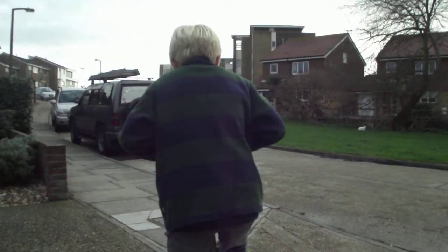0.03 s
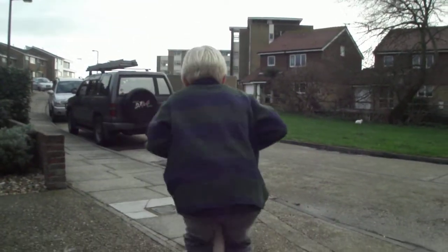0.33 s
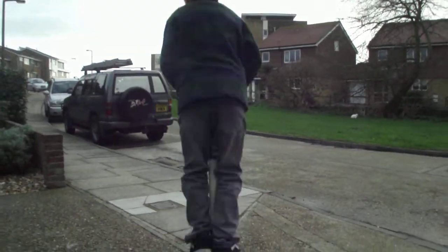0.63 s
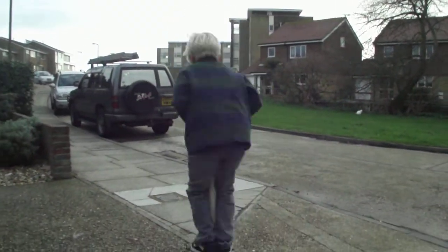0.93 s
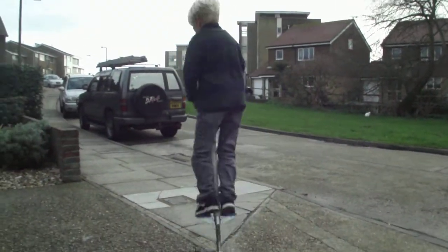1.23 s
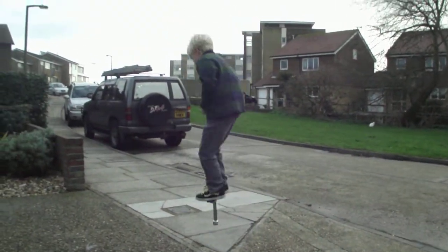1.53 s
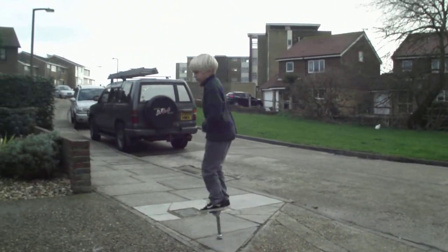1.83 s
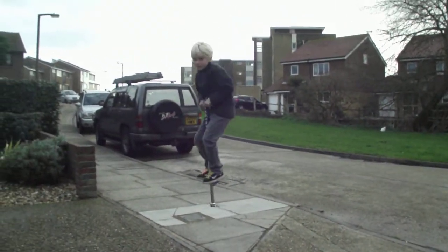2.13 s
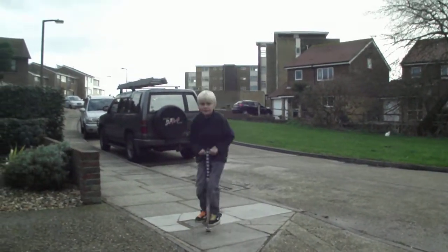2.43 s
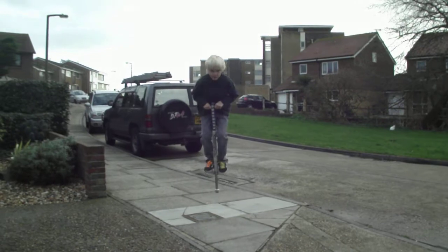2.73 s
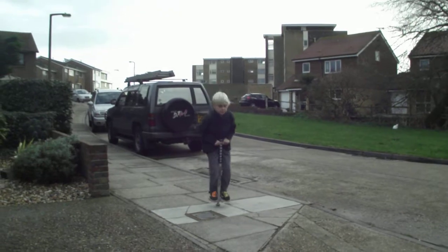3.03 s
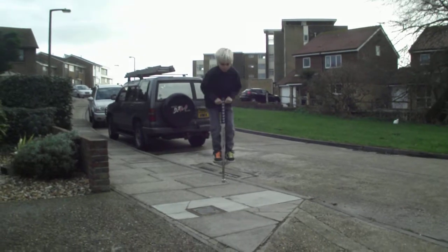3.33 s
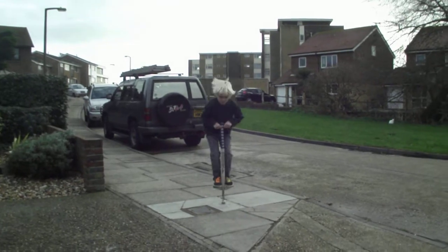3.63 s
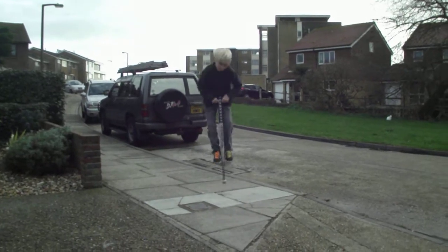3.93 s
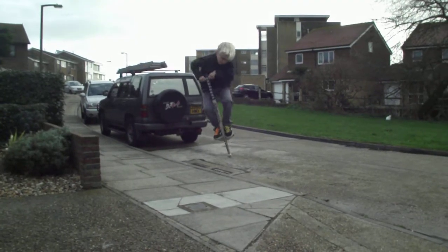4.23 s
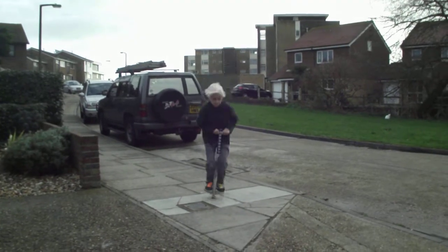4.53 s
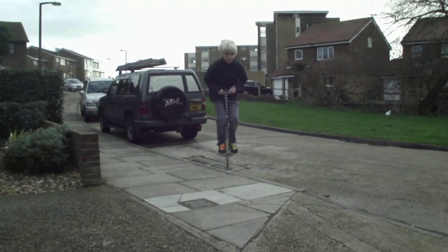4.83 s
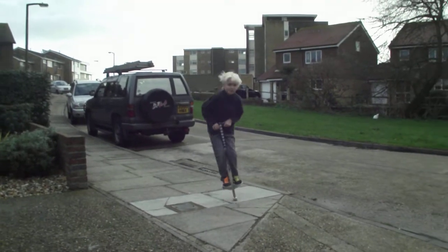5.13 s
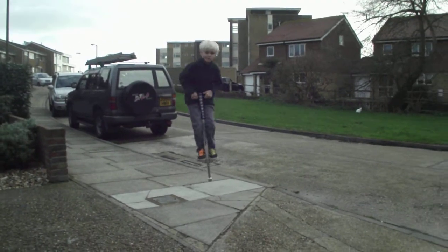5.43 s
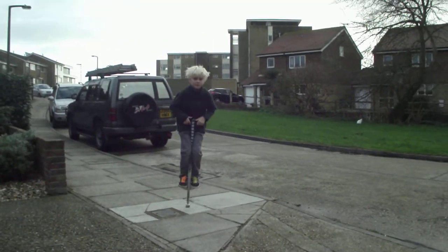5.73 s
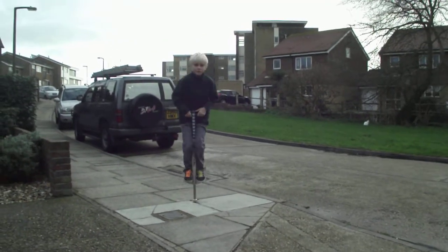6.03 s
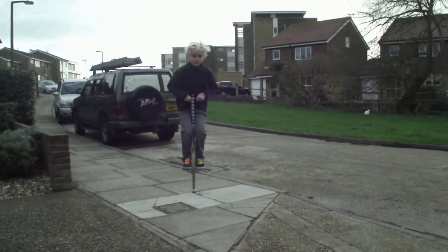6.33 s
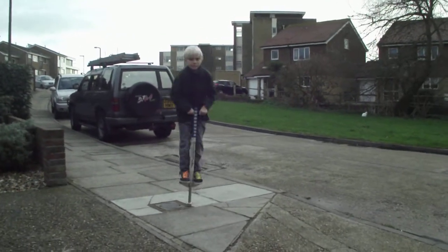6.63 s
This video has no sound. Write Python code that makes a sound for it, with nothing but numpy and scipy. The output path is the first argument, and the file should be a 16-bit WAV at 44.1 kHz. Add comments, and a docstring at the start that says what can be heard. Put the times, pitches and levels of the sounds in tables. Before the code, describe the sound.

A pogo stick rattles, then bounces ten times on paving slabs close to the microphone, in a steady rhythm. Each bounce has a rubber thud, a scraping steel spring, a knock and a sharp ringing clack, echoing faintly off house fronts. Wind and far traffic rumble through the quiet street, with a thin camcorder whine and a faint whistle once a second.

```python
"""Wind and far traffic rumble in a quiet street; a camcorder whines and whistles once a second.
A pogo stick rattles, then a child bounces on it ten times on paving slabs, close by. In each bounce
the rubber foot thuds down, the steel spring scrapes along its tube as it is squeezed, knocks at the
bottom, then scrapes back until the shaft clacks against its stop. The bright microphone overloads
on the hardest blows, and house fronts answer faintly."""
import sys
import numpy as np
from scipy import signal
from scipy.fft import rfft, irfft
from scipy.io import wavfile
from scipy.ndimage import uniform_filter1d

SR = 44100
rng = np.random.default_rng(int(sys.argv[2]) if len(sys.argv) > 2 else 0)


def store_pcm(level_fs):
    """Save levels as 16-bit WAV."""
    pcm = np.round(np.clip(level_fs, -1, 1) * 32767).astype(np.int16)
    wavfile.write(sys.argv[1], SR, np.atleast_2d(pcm).T)


N = 298557
TIME = np.arange(N) / SR


def undb(db):
    """Decibels to gain."""
    return 10 ** (np.asarray(db) / 20)


def unit(x):
    """Scale to rms 1."""
    return x / np.sqrt(np.mean(x ** 2))


def fade(t, t60):
    """Exponential decay, 60 dB in t60 seconds."""
    return np.exp(-np.log(1000) * t / t60)


def add(out, start_s, x):
    """Mix x into out from start_s."""
    i = max(int(start_s * SR), 0)
    out[i:i + len(x)] += x[:max(len(out) - i, 0)]


def walk(rate_hz):
    """Random steps at rate_hz, smoothed twice; rms 1."""
    hold = int(SR / rate_hz)
    steps = np.repeat(rng.standard_normal(N // hold + 1), hold)
    return unit(uniform_filter1d(uniform_filter1d(steps, hold), hold)[:N])


def colour(x, points, size=8192):
    """Minimum-phase filter shaped by (Hz, dB) points; keeps the power of white noise."""
    hz, db = np.transpose(points)
    grid_hz = np.maximum(np.arange(size // 2 + 1) * SR / size, 1)
    gain = undb(np.interp(np.log(grid_hz), np.log(hz), db))
    cepstrum = irfft(np.log(gain))
    cepstrum[1:size // 2] *= 2
    cepstrum[size // 2 + 1:] = 0
    response = irfft(np.exp(rfft(cepstrum)))
    return signal.fftconvolve(x, response / np.linalg.norm(response))[:N]


def resonance(x, hz, width_hz):
    """Band-pass with a moving centre: shift to 0 Hz, smooth, shift back."""
    spin = np.exp(2j * np.pi * np.cumsum(hz) / SR)
    pole = np.exp(-np.pi * width_hz / SR)
    return 2 * np.real(spin * signal.lfilter([1 - pole], [1, -pole], x / spin))


def tail(x, t60, delay_s):
    """Dense decay of modes or reflections, at unit power gain."""
    t = np.arange(SR) / SR
    response = rng.standard_normal(SR) * fade(t, t60) * (t > delay_s)
    return signal.fftconvolve(x, response / np.linalg.norm(response))


def rings(starts_s, levels_db, modes, scatter):
    """Damped modes, detuned at random on each blow."""
    out, t = np.zeros(N), np.arange(SR // 2) / SR
    for start_s, db in np.broadcast(starts_s, levels_db):
        for hz, mode_db, t60 in modes:
            detuned_hz = hz * (1 + scatter * rng.standard_normal())
            add(out, start_s, undb(db + mode_db) * fade(t, t60) * np.sin(2 * np.pi * detuned_hz * t))
    return out


# Wind and far traffic. Each row: frequency in Hz, relative density in dB.
STREET_SPECTRUM = [(15, -12.5), (26, -0.5), (50, -2), (110, -13), (240, -17.5), (470, -27), (700, -22.5),
                   (1700, -26.5), (2400, -24.5), (2880, -14.5), (3600, -33.5), (4800, -40.5), (8000, -39),
                   (14000, -44)]
# Breeze. Each row: time in seconds, relative rumble level in dB.
GUSTS = [(0.0, -29), (1.68, -29), (2.2, -34.5), (2.32, -29.5), (4.26, -29.5), (4.66, -26.5), (5.81, -30.5),
         (6.77, -32)]


def street(level_db=-26, waver_db=0.35, rumble_hz=130):
    """Far traffic washes above a rumble that follows the breeze."""
    air = colour(rng.standard_normal(N), STREET_SPECTRUM)
    low = signal.sosfiltfilt(signal.butter(2, rumble_hz, fs=SR, output="sos"), air)
    gust_db = np.interp(TIME, *np.transpose(GUSTS))
    rumble = low * undb(gust_db - gust_db.mean())
    traffic = (air - low) * undb(waver_db * walk(rate_hz=7))
    return undb(level_db) * unit(rumble + traffic)


def motor_whine(hz=7444, partials_db=(-44.5, -42), flutter=0.0021, flutter_hz=220):
    """The camcorder's motor: two partials with a quick flutter."""
    phase = 2 * np.pi * np.cumsum(hz * (1 + flutter * walk(flutter_hz))) / SR
    return sum(undb(db) * unit(np.sin(k * phase)) for k, db in enumerate(partials_db, 1))


# Camcorder whistle. Each row: start in seconds, end in seconds.
WHISTLE_SPANS = [(.14, .37), (1.15, 1.32), (2.15, 2.39), (3.15, 3.32), (4.15, 4.38), (5.15, 5.32),
                 (6.15, 6.38)]


def whistle(hz=10140, level_db=-46):
    """A thin tone in the camcorder switches on once a second."""
    gate = sum(1. * ((TIME > start) & (TIME < end)) for start, end in WHISTLE_SPANS)
    return undb(level_db) * uniform_filter1d(gate, size=200) * unit(np.sin(2 * np.pi * hz * TIME))


# Response of the struck stick. Each row: frequency in Hz, relative density in dB.
STRUCK_SPECTRUM = [(250, -25), (430, -23), (630, -11.5), (900, -16), (1250, -12), (1600, -12), (2400, -1.5),
                   (2950, 2.5), (3900, -16.5), (5100, -36), (6400, -16.5), (7850, -9), (9600, -17),
                   (13000, -33.5)]


def blows(starts_s, levels_db, t60):
    """Metal meets metal: brief contact chatter shakes the whole stick."""
    contact, t = np.zeros(N), np.arange(SR // 16) / SR
    for start_s, db in np.broadcast(starts_s, levels_db):
        add(contact, start_s, undb(db) * rng.choice([-1, 1], len(t)) * fade(t, t60))
    return colour(contact, STRUCK_SPECTRUM)


def knocks(starts_s, levels_db, t60, cutoff_hz=4800):
    """Duller blows, with the treble rolled off."""
    lowpass = signal.butter(1, cutoff_hz, fs=SR, output="sos")
    return signal.sosfilt(lowpass, blows(starts_s, levels_db, t60))


# Rattles. Each row: start in seconds, relative level in dB.
RATTLE_HITS = [(.218, -12.5), (.277, -17), (1.278, -20), (2.404, -12), (2.442, -11.5), (3.074, -14),
               (3.778, -23), (4.532, -20), (6.12, -20)]


def rattles():
    """Loose parts knock on the stick."""
    return knocks(*np.transpose(RATTLE_HITS), t60=0.043)


# Landings. Each row: start in seconds, squeeze length in seconds, then relative levels in dB of
# foot thud, clank, squeeze scrape, bottom thump, bottom knock and hollowness.
TOUCHDOWNS = [(0.324, 0.047, -47.5, -33, -19.5, -36, -31, 6),
              (.8869, 0.12, -19.5, -4, -11.5, -23.5, -9, 3.5),
              (1.5979, 0.089, -20, -4.5, -11, -15, -12.5, 0),
              (2.2656, 0.084, -21.5, -16, -9.5, -20, -9.5, -0.5),
              (2.9096, 0.099, -23.5, -16, -9.5, -21.5, -15.5, -1),
              (3.607, 0.11, -19.5, -14, -11.5, -17.5, -11.5, -4),
              (4.4, 0.091, -16, -8, -9.5, -15, -10.5, 0), (5.088, 0.093, -18.5, -9, -11.5, -22, -12.5, 2.5),
              (5.732, 0.098, -16, -11, -12, -36, -21, 3), (6.3854, 0.09, -16.5, -6, -8.5, -20.5, -7.5, -1)]
TOUCH_S, SQUEEZE_S, FOOT_DB, CLANK_DB, SQUEEZE_DB, THUMP_DB, KNOCK_DB, HOLLOW_DB = np.transpose(TOUCHDOWNS)
BOTTOM_S = TOUCH_S + SQUEEZE_S
BOUNCE_ROW = np.maximum(np.searchsorted(TOUCH_S, TIME) - 1, 0)
# Modes of foot on slab, and of frame. Each row: frequency in Hz, relative level in dB, t60 in seconds.
FOOT_MODES = [(161, -8.5, 0.066), (311, 5.5, 0.015), (610, 3, 0.012)]
FRAME_MODES = [(108, -9, 0.14), (177.5, -0.5, 0.055), (287, -9, 0.038)]


def foot_thud(slap_delay_s=0.02034):
    """The rubber foot hits the slab; a second slap rings the frame."""
    thud = rings(TOUCH_S, FOOT_DB + 7, FOOT_MODES, scatter=0.081)
    slap = rings(TOUCH_S + slap_delay_s, FOOT_DB - 1.5, FRAME_MODES, scatter=0.16)
    return thud + slap


def landing_clank():
    """The landing jolts the steel."""
    return blows(TOUCH_S + 0.001, CLANK_DB + 6, t60=0.011)


def shaft_speed(touch_s, bottom_s, lift_s, squeeze_db, release_db):
    """One bounce: the spring slows the shaft to a halt, then drives it back and shivers on."""
    slowing_db, ease_db_per_s = 7, 62
    turn_s, gather_s, shiver_s = 0.035, 0.09, 0.016
    depth = np.clip((TIME - touch_s) / (bottom_s - touch_s), 0, 1)
    halt = fade(np.maximum(TIME - bottom_s, 0), t60=0.055)
    down = (TIME > touch_s) * undb(squeeze_db + 1 - slowing_db * depth ** 2) * halt
    rising_s = np.minimum(TIME, lift_s) - bottom_s - turn_s
    gather = np.sin(np.pi / 2 * np.clip(rising_s / gather_s, 0, 1)) ** 2
    ease_db = ease_db_per_s * np.maximum(rising_s - gather_s, 0)
    settle = fade(np.maximum(TIME - lift_s - shiver_s, 0), t60=0.23)
    return down + gather * undb(release_db - ease_db) * settle


def friction(judder_hz=150, judder_db=2.33, ticks_per_s=190, tick_db=-6, tick_spread_db=2.5):
    """Coils slip on the tube and tick against it at an uneven pace."""
    slips = unit(rng.standard_normal(N) * undb(judder_db * walk(judder_hz)))
    coils_passed = np.floor(np.cumsum(ticks_per_s * np.exp(.5 * walk(ticks_per_s))) / SR)
    impulses = np.diff(coils_passed, prepend=0) * rng.choice([-1, 1], N)
    ticks = unit(impulses * undb(tick_spread_db * rng.standard_normal(N)))
    return unit(slips + undb(tick_db) * ticks)


# Lift-offs. Each row: arrival at the stop in seconds, relative levels in dB of release scrape and
# shaft rebound, loaded spring resonance in Hz.
RELEASES = [(.505, -12.5, -11, 3030), (1.141, -9, -6.5, 2800), (1.831, -11, -10.5, 2989),
            (2.491, -9.5, -26, 3100), (3.157, -11, -21, 2990), (3.862, -9, -15, 3200),
            (4.645, -11, -17, 3230), (5.328, -11.5, -24, 3070), (5.982, -11, -13, 3037),
            (6.621, -9, -37, 3050)]
LIFT_S, RELEASE_DB, REBOUND_DB, LOADED_HZ = np.transpose(RELEASES)
# Response of the scraped spring. Each row: frequency in Hz, relative density in dB.
SCRAPE_SPECTRUM = [(200, -21), (430, -23), (620, -13), (880, -22), (1220, -10), (1600, -11.5), (2550, -6),
                   (3080, -1.5), (3950, -11), (5100, -32.5), (6400, -21), (7850, -10), (10000, -25.5),
                   (13000, -41.5)]


def spring_scrape(free_hz=2870, unload_s=0.033):
    """Friction follows shaft speed; the spring's resonance glides to free_hz after lift-off."""
    bounces = zip(TOUCH_S, BOTTOM_S, LIFT_S, SQUEEZE_DB, RELEASE_DB)
    speed = sum(shaft_speed(*bounce) for bounce in bounces)
    free = np.clip((TIME - LIFT_S[BOUNCE_ROW]) / unload_s, 0, 1)
    zing_hz = (1 - free) * LOADED_HZ[BOUNCE_ROW] + free * free_hz
    rub = friction()
    zing = undb(-2) * resonance(rub, zing_hz, width_hz=390)
    return colour(undb(-3) * speed * (rub + zing), SCRAPE_SPECTRUM)


def bottom_knock():
    """The spring bottoms out, steel on steel."""
    return knocks(BOTTOM_S, KNOCK_DB + 6, t60=0.026)


def frame_thump():
    """Bottoming out rings the frame's low modes."""
    return rings(BOTTOM_S + 0.00079, THUMP_DB + 6.5, FRAME_MODES, scatter=0.094)


def stop_clack(chatter_delay_s=0.015, rebound_delay_s=0.057):
    """The shaft hits its stop, chatters and falls back on it once more."""
    clack = blows(LIFT_S, levels_db=1.5, t60=0.017)
    chatter = blows(LIFT_S + chatter_delay_s, levels_db=-12, t60=0.037)
    rebound = blows(LIFT_S + rebound_delay_s, REBOUND_DB, t60=0.027)
    return clack + chatter + rebound


# Tube modes. Each row: frequency in Hz, level in dB, t60 in seconds.
TUBE_MODES = [(633, -31, 0.18), (2540, -30.5, 0.35), (2775, -15, 0.32), (5930, -31.5, 0.14),
              (7000, -22, 0.15), (8030, -20, 0.15), (9260, -27.5, 0.1)]


def tube_ring():
    """The tube sings briefly after the shaft hits its stop."""
    return rings(LIFT_S, levels_db=0, modes=TUBE_MODES, scatter=0.0106)


def spring_ring(drive, hz=2530, width_hz=570):
    """The spring rings on around hz; its modes shift at each landing, bottom and lift-off."""
    out = np.zeros(N)
    edges_s = np.sort(np.concatenate([[0], TOUCH_S, BOTTOM_S, LIFT_S]))
    parts = np.split(drive, (edges_s * SR).astype(int))[1:]
    for start_s, part in zip(edges_s, parts):
        add(out, start_s, tail(np.append(part, 0), t60=0.16, delay_s=0.0016))
    return signal.lfilter(*signal.iirpeak(hz, hz / width_hz, fs=SR), out)


def pogo_stick(hollow_hz=1500):
    """Ringing steel over low thuds; the steel sounds hollower or thinner as the child turns."""
    steel = rattles() + landing_clank() + spring_scrape() + bottom_knock() + stop_clack()
    steel += undb(-5.5) * spring_ring(steel)
    low = signal.sosfiltfilt(signal.butter(3, hollow_hz, fs=SR, output="sos"), steel)
    steel += low * (undb(HOLLOW_DB[BOUNCE_ROW]) - 1)
    return steel + foot_thud() + frame_thump() + tube_ring()


def scene():
    """Street, camcorder, stick and house-front echo at one microphone, on both channels."""
    background = street() + motor_whine() + whistle()
    stick = pogo_stick()
    echo = undb(-18.5) * tail(stick, t60=0.99, delay_s=0.018)[:N]
    return np.tile(background + stick + echo, (2, 1))


def record(dry, ceiling=1.0, top_hz=15600):
    """The input overloads on the hardest blows; left lags one sample; the top is cut."""
    left, right = np.clip(dry, -ceiling, ceiling)
    pair = np.array([np.append(0, left[:-1]), right])
    return signal.sosfilt(signal.ellip(8, .2, 70, top_hz, fs=SR, output="sos"), pair)


dry = scene()
out = record(dry)
store_pcm(out)
```